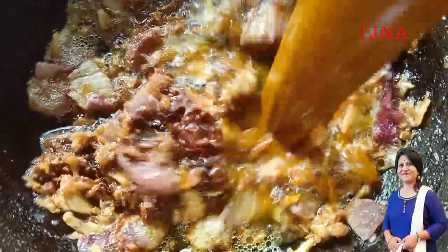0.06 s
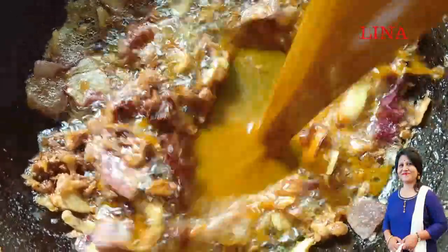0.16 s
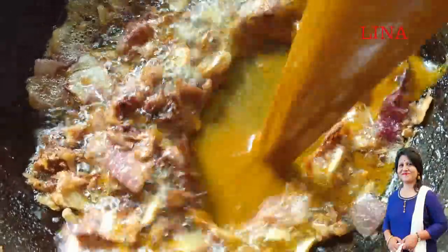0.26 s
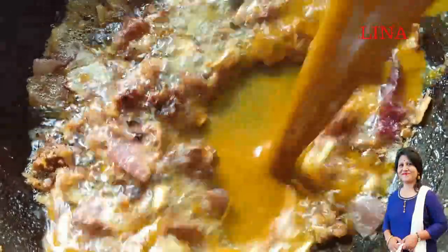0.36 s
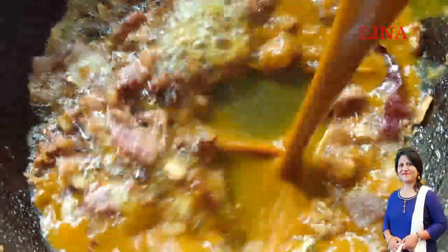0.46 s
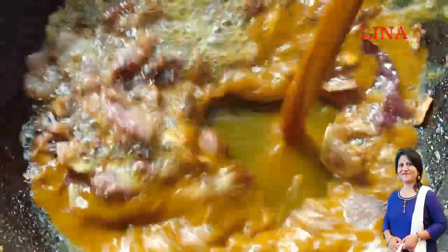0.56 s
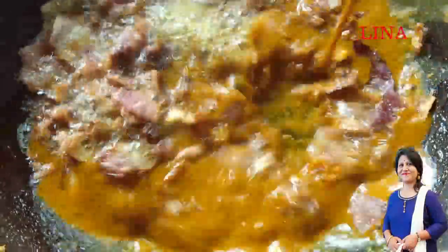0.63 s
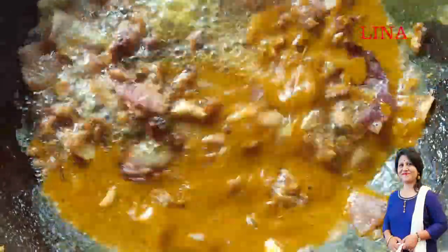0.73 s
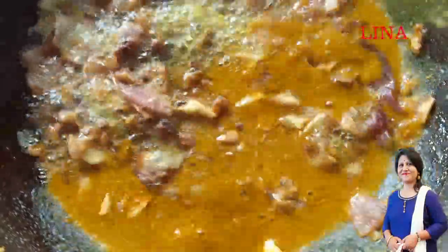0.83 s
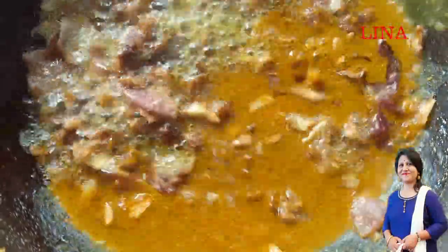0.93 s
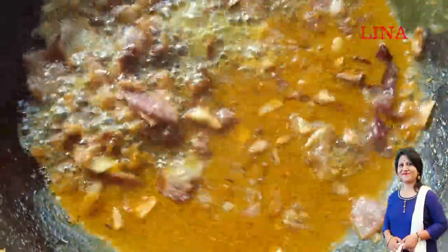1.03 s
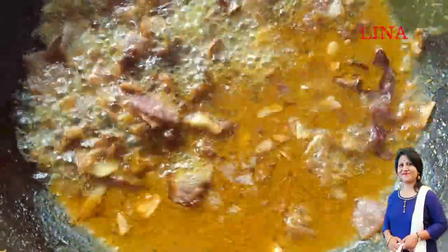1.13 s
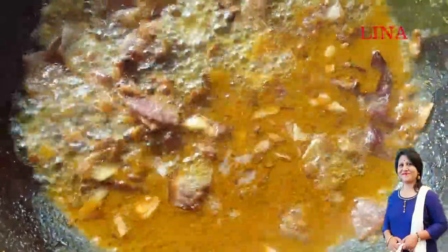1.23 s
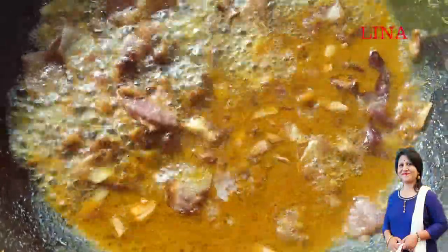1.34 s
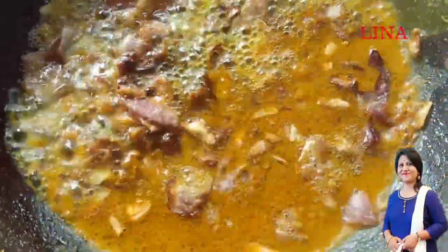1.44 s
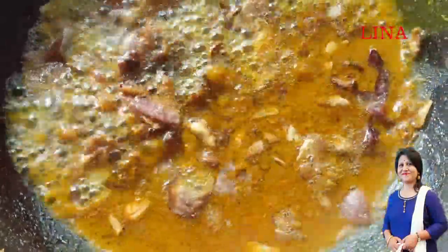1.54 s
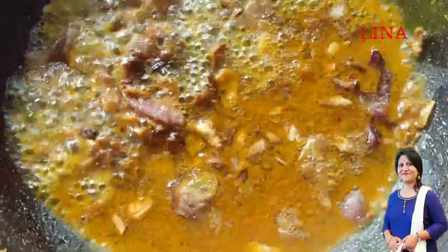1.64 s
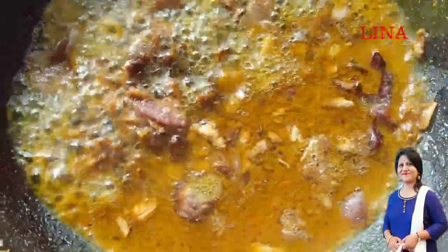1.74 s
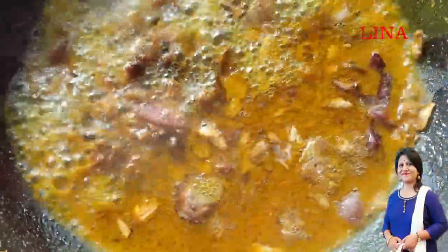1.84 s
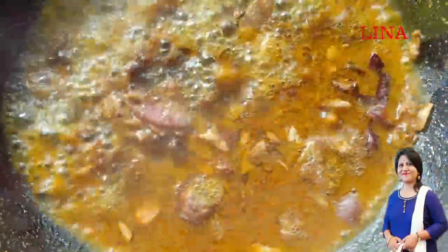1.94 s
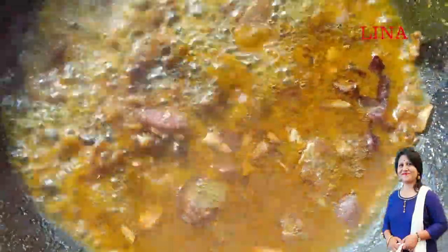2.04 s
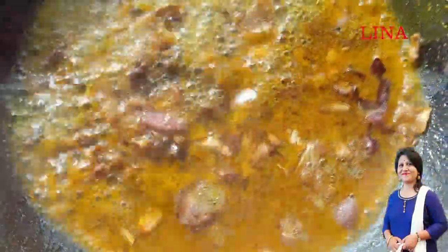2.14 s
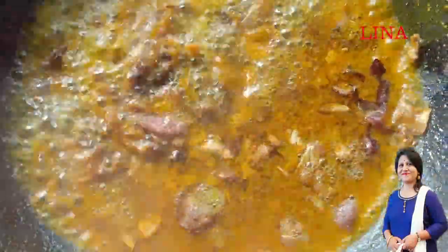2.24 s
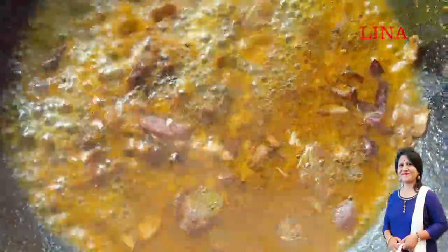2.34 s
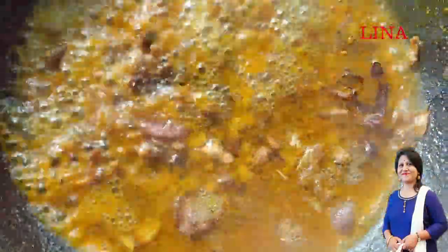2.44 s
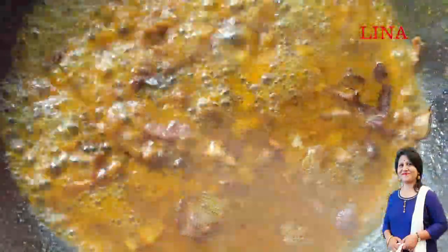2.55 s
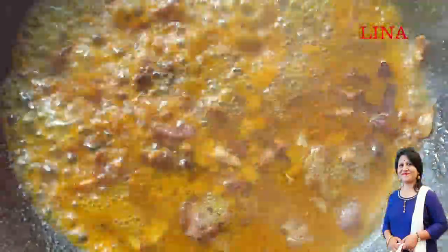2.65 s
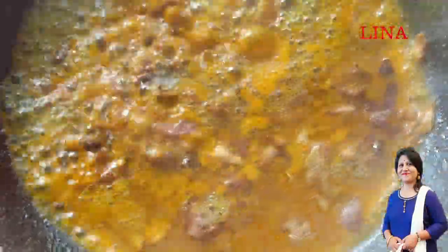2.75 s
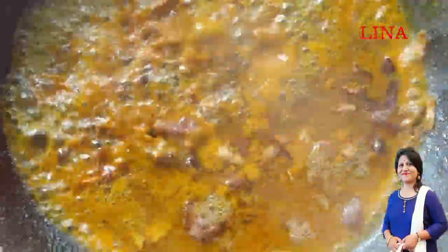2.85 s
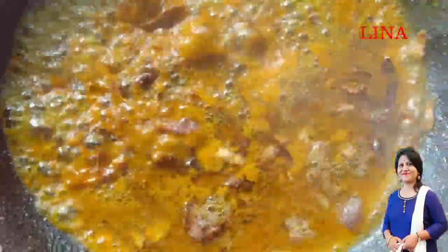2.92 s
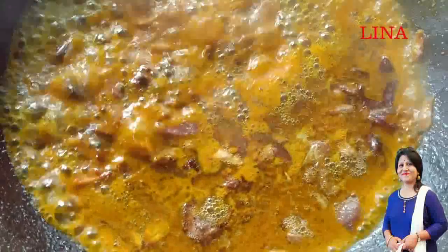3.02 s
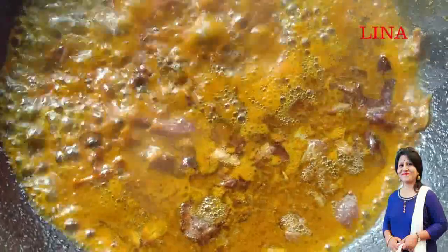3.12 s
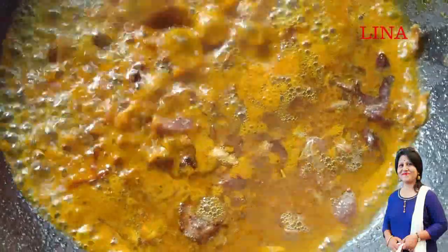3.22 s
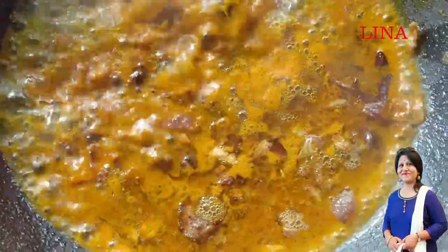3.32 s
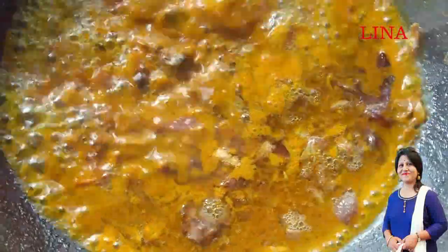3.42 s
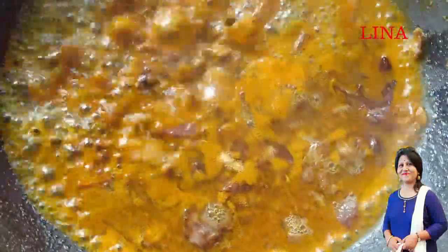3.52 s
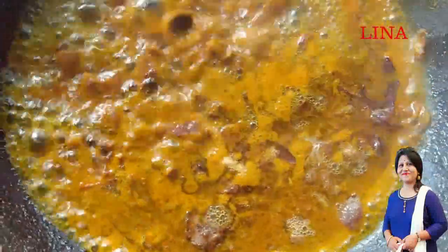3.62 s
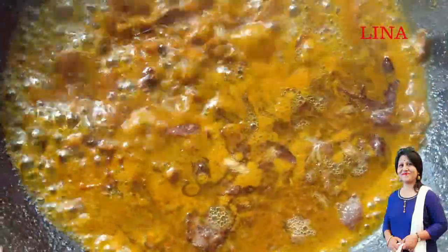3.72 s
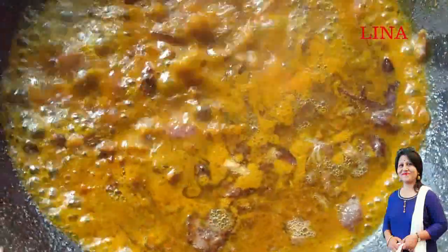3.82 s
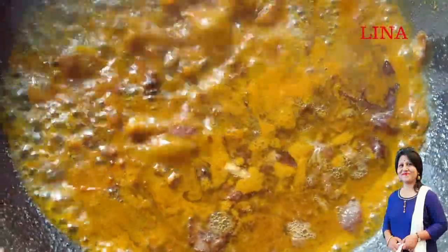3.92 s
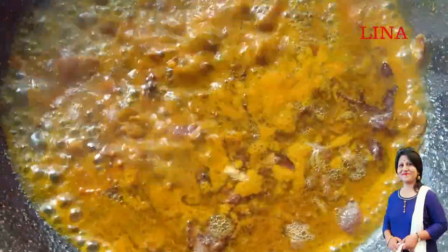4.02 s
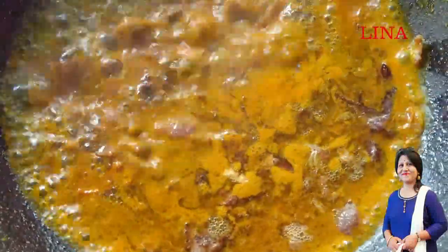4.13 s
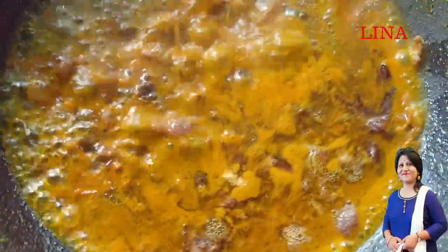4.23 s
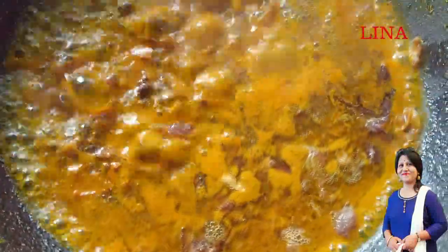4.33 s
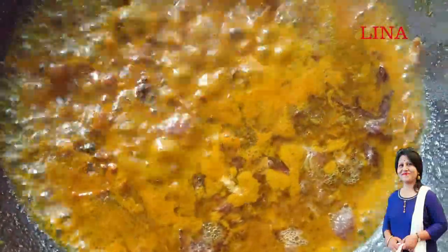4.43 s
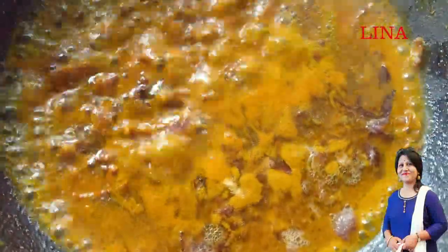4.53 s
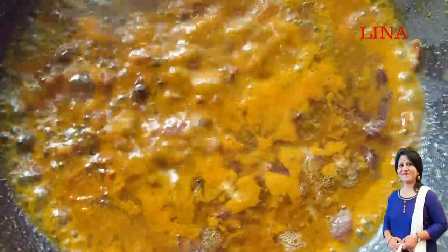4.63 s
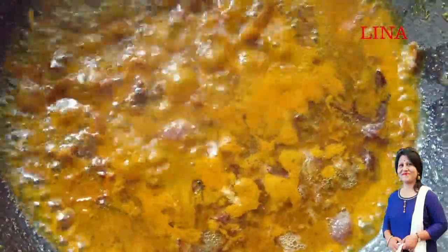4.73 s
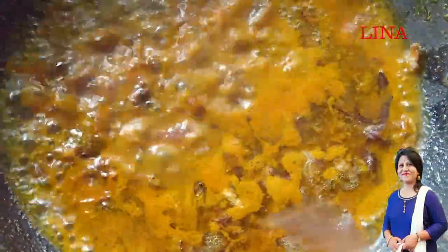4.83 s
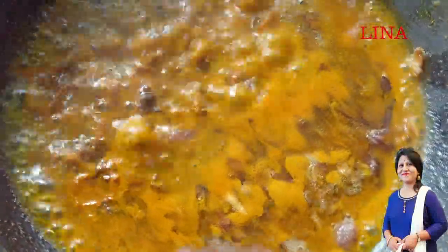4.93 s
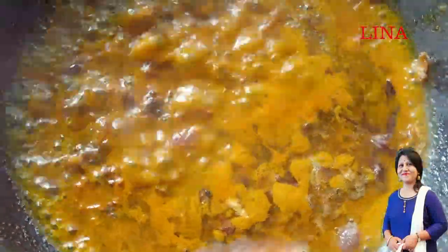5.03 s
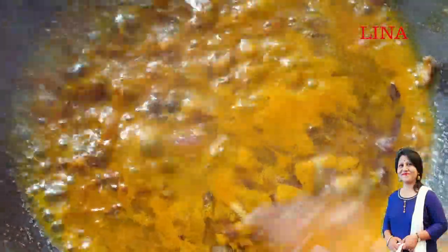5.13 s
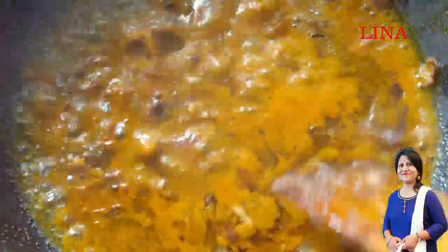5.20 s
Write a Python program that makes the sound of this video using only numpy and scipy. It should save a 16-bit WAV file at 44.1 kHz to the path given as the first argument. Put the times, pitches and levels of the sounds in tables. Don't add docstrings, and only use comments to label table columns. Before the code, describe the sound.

Close, fierce sizzle in a pan surges at once, spits sharply, then settles to lower bubbling over a returning fan hum; a utensil clinks near the end.

```python
import sys
import numpy as np
from scipy import signal
from scipy.fft import rfft, irfft, next_fast_len
from scipy.io import wavfile

SR = 44100
rng = np.random.default_rng(int(sys.argv[2]) if len(sys.argv) > 2 else 0)


def generate_wav(sig):
    pcm = np.round(np.clip(np.atleast_2d(sig).T, -1, 1) * 32767).astype(np.int16)
    wavfile.write(sys.argv[1], SR, pcm)


def level_to_linear(level):
    exponent = np.asarray(level, float) / 20
    return 10 ** exponent


N = 232230
TIME = np.arange(N) / SR

# frequency [Hz], density [dB per Hz].
FAN_SPECTRUM = [(18, -54), (30, -16), (92, -5), (187, 0.5), (238, 3), (292, 1.5), (400, -3.5), (520, -10),
                (880, -120)]
# frequency [Hz], level [dB].
MOTOR_LINES = [(100, 3), (198, -8), (248, -1), (350, 0), (500, 6.5)]
# time [s], gain [dB].
AUTO_GAIN = [(0, 0.5), (.1, 0.5), (.22, -7), (.8, -11.5), (1.4, -10), (2.3, -5), (3.6, -1), (5.27, 1)]

# start [s], peak [dB], pitch [Hz].
STOVE_THUDS = [
    (.77, -44, 70),
    (2.92, -43, 80),
    (3.087, -29, 153),
    (3.94, -28, 158),
]
# start [s], peak [dB], pitch [Hz].
UTENSIL_KNOCKS = [
    (4.883, -14, 463),
    (4.909, -20, 604),
    (5.004, -22, 690),
]
# start
# [s], peak [dB], pitch [Hz].
BOWL_RINGS = [(4.41, -27, 508), (4.89, -25.5, 348.6), (4.925, -27, 452), (4.925, -26, 602),
              (4.955, -23.5, 446), (4.958, -28, 349)]
# start [s], peak [dB], pitch [Hz].
PAN_WALL = [(3.086, -18.5, 1817)]

# start [s], peak [dB], pitch [Hz].
BUBBLE_SWELLS = [(.0615, -4, 2540), (.186, -3, 2450), (.493, -12, 2500), (.509, -6, 2350),
                 (1.665, -9, 2480), (3.084, 0.5, 2490), (3.096, -15, 2400), (3.134, -4, 2510),
                 (3.209, -7, 2400), (3.364, -5.5, 2520)]
# start [s], peak [dB], pitch [Hz].
DROPLET_PINGS = [(.0752, -5, 5800), (.1441, -8, 5700), (.163, -24, 5300), (.6938, -8, 5980)]
# start [s], peak [dB].
FAT_POPS = [(.0752, -11), (.1455, -12), (.6933, -13), (1.0326, -17), (1.3957, -17), (1.6641, -17),
            (1.8462, -16), (3.0862, -5), (3.136, -19), (4.154, -20)]

# time [s], steam level [dB].
BOIL_LEVEL = [(0, -18.5), (.03, -14.5), (.07, -9.5), (.3, -11), (.56, -12), (.88, -14.5), (1.04, -15),
              (1.6, -14), (1.84, -13), (2.0, -15), (2.8, -16.5), (3.12, -16), (3.44, -17), (3.6, -17.5),
              (3.92, -18), (4.4, -20.3), (5.04, -22.5), (5.27, -23.5)]
# time [s], thickness [0-1].
THICKNESS = [(0, 0.02), (.6, 0.31), (1, 0.44), (2, 0.71), (3, 0.96), (4.2, 0.95), (5.27, 0.98)]
# centre [s], rise [dB], half length [s].
STEAM_FLARES = [(0.056, 0.5, 0.01), (0.516, 2, .02), (.56, 1.5, 0.02), (0.724, 0, .015), (1.52, 0, 0.011),
                (1.66, 0, 0.022), (1.803, 1.5, .02), (1.896, 1.5, .02), (2.078, 1, 0.02), (2.272, 2, 0.024),
                (3.204, 0, 0.011), (3.38, 2, 0.018), (3.485, 3.5, 0.025), (3.965, 2.5, .03),
                (4.28, 1.5, 0.018), (4.549, 5, 0.0083), (4.658, 4, 0.009), (4.79, 2.5, .015)]
# frequency [Hz], density [dB per Hz].
GURGLE_IN_THIN = [(150, -37), (250, -24), (380, -21), (520, -10), (700, -4), (880, -3.5), (1050, -9.5),
                  (1200, -15.5), (1600, -28), (2800, -100)]
GURGLE_IN_THICK = [(120, -36), (200, -12.5), (241, -15.5), (392, -12), (504, -3.5), (668, -2), (794, -5.5),
                   (1300, -11.5), (1690, -30.5), (2860, -120)]

# frequency [Hz], width [Hz], level in thin [dB], in thick sauce [dB].
PORT_RESONANCES = [(1472, 550, -20, -11), (2350, 397, -4.5, 4), (2545, 363, 2, 4), (3200, 1500, -15, -44),
                   (5010, 750, -15.5, -18), (5956, 960, -10.5, -18.5), (7170, 600, -24.5, -32),
                   (11400, 1400, -32.5, -44), (13600, 820, -28, -38), (15200, 820, -29, -38)]
# frequency [Hz], density [dB per Hz].
BURST_COLOUR = [(200, -41), (1150, -37), (1700, -17.5), (3300, -27), (4100, -25.5), (8500, -35),
                (9800, -44.5), (12300, -41.5), (14400, -36), (16000, -36.5)]

# level at mid boil in thin paste [dB], share of the boil's change [ratio],
# change in thick sauce [dB], first splash [dB], splash fade [s].
FIZZ_LAW = (-25.5, 0.71, -1.5, 2, 0.34)
SPRAY_LAW = (-35, 0.86, -3.5, 0.5, 0.4)
GURGLE_LAW = (-28, 0.46, -0.5, -8.5, 0.26)


def evened(x):
    return x / np.sqrt(np.mean(x ** 2) + 1e-20)


def read(points, hz):
    f, value = np.transpose(points)
    return np.interp(np.log(hz + 1), np.log(f + 1), value)


def curve(rows):
    seconds, values = np.transpose(rows)
    return np.interp(TIME, seconds, values)


def causal(gain, size=8192):
    hz = abs(np.fft.fftfreq(size, 1 / SR))
    log_gain = np.log(np.maximum(gain(hz), 1e-5))
    return np.fft.ifft(np.exp(np.conj(signal.hilbert(log_gain)))).real[:size // 2]


def coloured(drive, colour):
    return evened(signal.oaconvolve(drive, colour)[:N])


def wander(lo_hz, hi_hz):
    size = next_fast_len(N)
    hz = np.fft.rfftfreq(size, 1 / SR)
    shape = 1 / np.sqrt((1 + (lo_hz / (hz + 1e-3)) ** 2) * (hz + lo_hz) * (1 + (hz / hi_hz) ** 2))
    return evened(irfft(rfft(rng.standard_normal(size)) * shape, size)[:N])


def add(mix, s, sound):
    part = mix[round(s * SR):][:len(sound)]
    part += sound[:len(part)]


def kitchen():
    rumble = coloured(rng.standard_normal(N), causal(lambda hz: level_to_linear(read(FAN_SPECTRUM, hz))))
    lines = np.zeros(N)
    for hz, db in MOTOR_LINES:
        waver_db = 0.62 * wander(0.88, 6.8)
        lines += level_to_linear(db + waver_db) * np.sin(2 * np.pi * (hz * TIME + rng.random()))
    gain_db = curve(AUTO_GAIN)
    return level_to_linear(-46.5 + 1.15 * gain_db) * lines + level_to_linear(-39.5 + 0.86 * gain_db) * rumble


def blows(rows, rise_s, t60, tail_db, tail_t60):
    t, out = np.arange(SR // 2) / SR, np.zeros(N)
    noise = rng.standard_normal((len(rows), len(t)))
    for (s, db, hz), z in zip(rows, noise):
        rise = 1 - np.exp(-(t / rise_s) ** 2)
        ring = level_to_linear(-60 * t / t60) * np.sin(2 * np.pi * hz * t) * rise
        tail = evened(np.convolve(z, ring)[:len(t)])
        tail *= level_to_linear(tail_db - 60 * t / tail_t60) * (1 - np.exp(-t / 0.04))
        add(out, s, level_to_linear(db) * (ring / abs(ring).max() + tail))
    return out


def stove_thuds():
    return blows(STOVE_THUDS, rise_s=0.0037, t60=0.08, tail_db=-15, tail_t60=0.2)


def utensil():
    knocks = blows(UTENSIL_KNOCKS, rise_s=0.0015, t60=0.02, tail_db=-12, tail_t60=0.35)
    bowl = blows(BOWL_RINGS, rise_s=0.0057, t60=0.28, tail_db=-18, tail_t60=0.24)
    return knocks + bowl


def pan_wall():
    return blows(PAN_WALL, rise_s=0.0028, t60=0.21, tail_db=-29, tail_t60=0.2)


def bubble_swells():
    return blows(BUBBLE_SWELLS, rise_s=0.0019, t60=0.021, tail_db=-22, tail_t60=0.1)


def droplet_pings():
    return blows(DROPLET_PINGS, rise_s=0.0005, t60=0.0068, tail_db=-28, tail_t60=0.05)


def port_colour(thick):
    def gain(hz):
        power = level_to_linear(2 * read(BURST_COLOUR, hz))
        for f, width, *db in PORT_RESONANCES:
            power = power + level_to_linear(2 * db[thick]) / (1 + (2 * (hz - f) / width) ** 2) ** 1.703
        return np.sqrt(power)
    return causal(gain)


def pops():
    t, puffs = np.arange(200) / SR, np.zeros(N)
    noise = np.diff(rng.standard_normal((len(FAT_POPS), len(t) + 1)))
    colour = port_colour(0)
    for (s, db), z in zip(FAT_POPS, noise):
        puff = np.convolve(z * level_to_linear(-60 * t / 0.006), colour)
        add(puffs, s, level_to_linear(db) * puff / abs(puff).max())
    return puffs


def bursts(per_s, spread_db):
    hit, sign, size = rng.random((N, 3)).T
    size_db = spread_db * np.minimum(-np.log(size + 1e-9), 4)
    return evened((hit < per_s / SR) * np.sign(sign - 0.5) * level_to_linear(size_db))


def thickening(drive, thin_colour, thick_colour):
    share = np.clip(curve(THICKNESS), 0, 1)
    return (1 - share) * coloured(drive, thin_colour) + share * coloured(drive, thick_colour)


def follow(mid_db, share, thick_db, splash_db, fade_s):
    splash = np.minimum(TIME / 0.056, 1) * np.exp(-np.maximum(TIME - 0.078, 0) / fade_s)
    boil_db = curve(BOIL_LEVEL) + 16
    return level_to_linear(mid_db + share * boil_db + thick_db * curve(THICKNESS) + splash_db * splash)


def gurgle():
    drive = evened(rng.standard_normal(N) + 0.54 * bursts(600, 1.0))
    drive *= level_to_linear(0.25 * wander(0.91, 30))
    thin = causal(lambda hz: level_to_linear(read(GURGLE_IN_THIN, hz)))
    thick = causal(lambda hz: level_to_linear(read(GURGLE_IN_THICK, hz)))
    return follow(*GURGLE_LAW) * thickening(drive, thin, thick)


def layer(drive, lo_hz, hi_hz):
    band = signal.firwin(301, [lo_hz, hi_hz], pass_zero=False, fs=SR)
    return thickening(signal.oaconvolve(drive, band, "same"), port_colour(0), port_colour(1))


def flares_db():
    return sum(db * np.exp(-0.5 * ((TIME - s) / half_s) ** 2) for s, db, half_s in STEAM_FLARES)


def sizzle():
    spit_db = 0.72 * wander(2.1, 120)
    crackle = bursts(2400, 4.1)

    steam = evened(rng.standard_normal(N) + 0.35 * crackle)
    steam *= level_to_linear(spit_db + 0.5 * wander(17.0, 44))
    steam = level_to_linear(curve(BOIL_LEVEL) + flares_db()) * layer(steam, 300, 3900)

    fizz = evened(rng.standard_normal(N) + 0.64 * crackle)
    fizz *= level_to_linear(0.65 * spit_db + 0.73 * wander(5.1, 100))
    fizz = follow(*FIZZ_LAW) * layer(fizz, 3900, 8800)

    fine = evened(rng.standard_normal(N) + 0.5 * crackle + 0.72 * bursts(2400, 2.9))
    mist = fine * level_to_linear(0.45 * spit_db + 0.91 * wander(3.2, 100))
    spray = fine * level_to_linear(0.45 * spit_db + 0.91 * wander(3.2, 100))
    spray = level_to_linear(-5.0) * layer(spray, 8800, 12600) + level_to_linear(-0.3) * layer(mist, 12600, 17000)
    return steam + fizz + follow(*SPRAY_LAW) * spray


def scene():
    background = kitchen() + stove_thuds() + utensil()
    pan = pan_wall() + bubble_swells() + droplet_pings() + pops() + gurgle() + sizzle()
    return (background + pan)[None]


def top_cut(x):
    return signal.sosfilt(signal.butter(12, 16940, fs=SR, output="sos"), x)


def record(dry):
    flat = np.clip(dry, -0.99, 0.99)
    thin = signal.sosfilt(signal.butter(1, 60, "high", fs=SR, output="sos"), flat)
    low_pass = signal.firwin(1023, 15760, window=("kaiser", 11), fs=SR)
    band = signal.oaconvolve(thin, low_pass[None], "same")
    return top_cut(band)


dry = scene()
out = record(dry)
generate_wav(out)
```